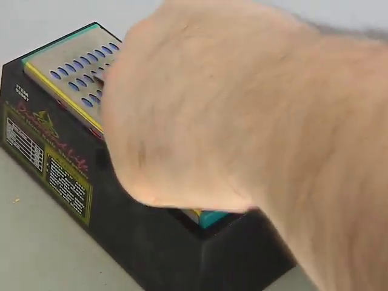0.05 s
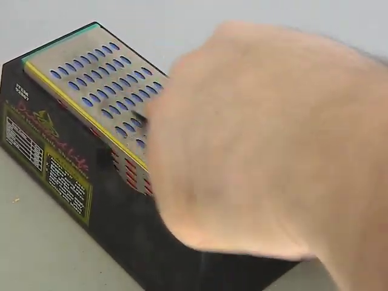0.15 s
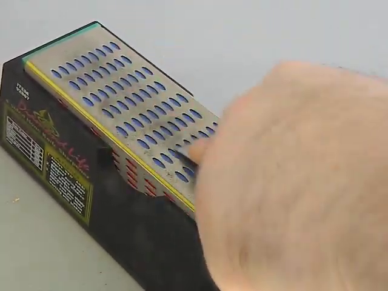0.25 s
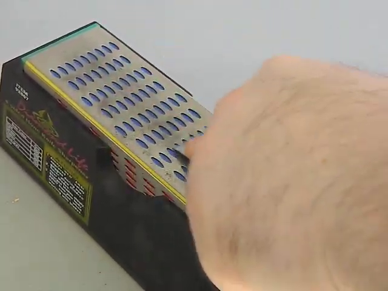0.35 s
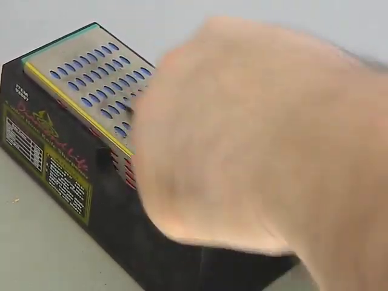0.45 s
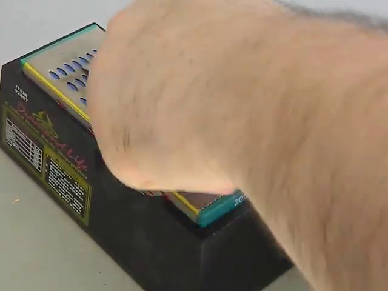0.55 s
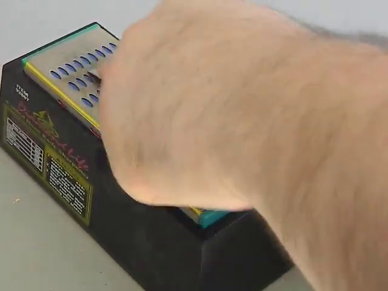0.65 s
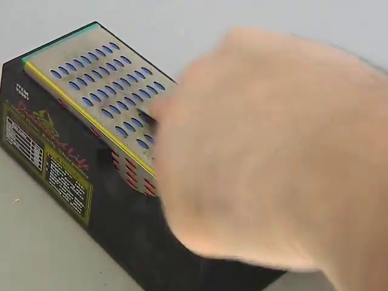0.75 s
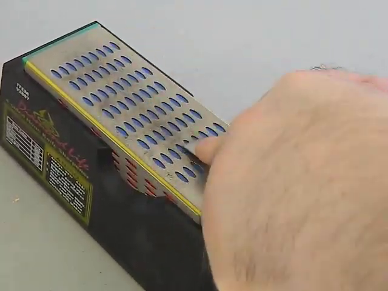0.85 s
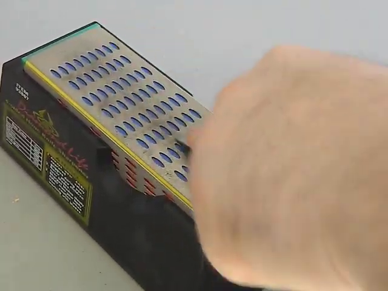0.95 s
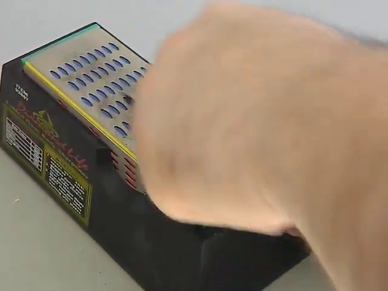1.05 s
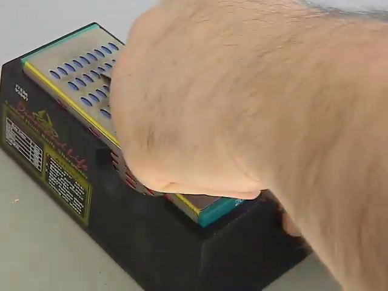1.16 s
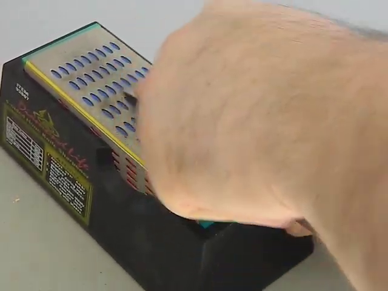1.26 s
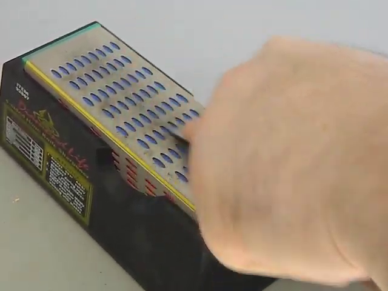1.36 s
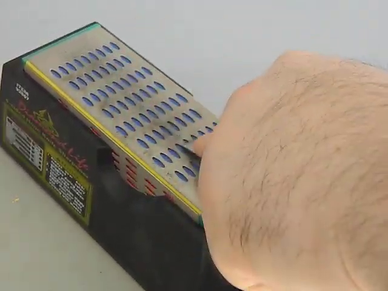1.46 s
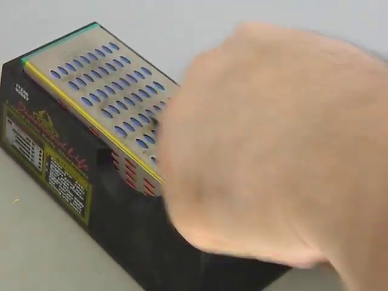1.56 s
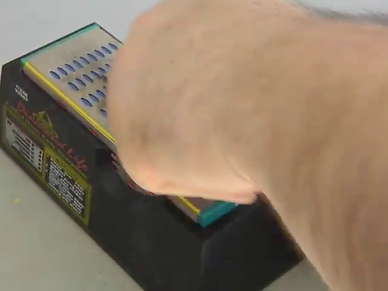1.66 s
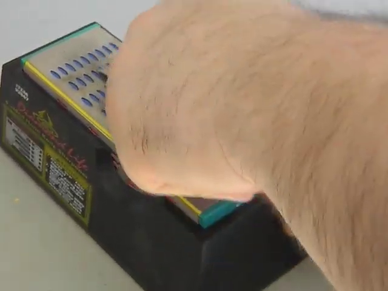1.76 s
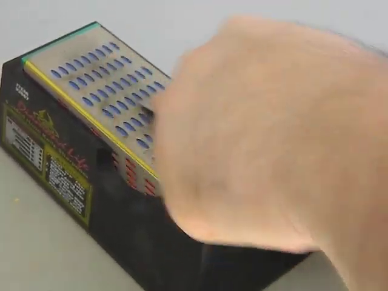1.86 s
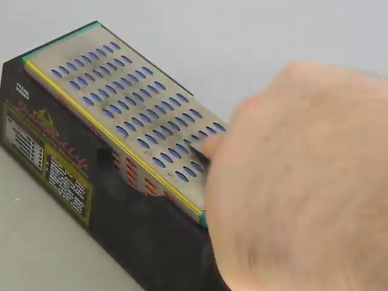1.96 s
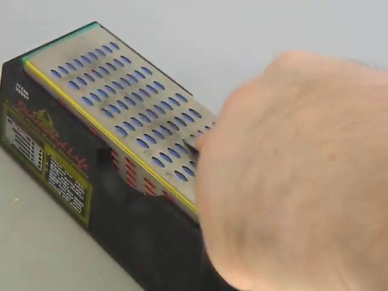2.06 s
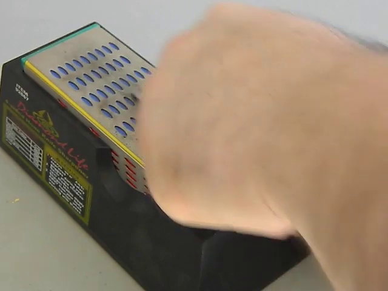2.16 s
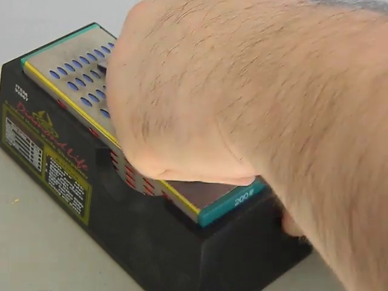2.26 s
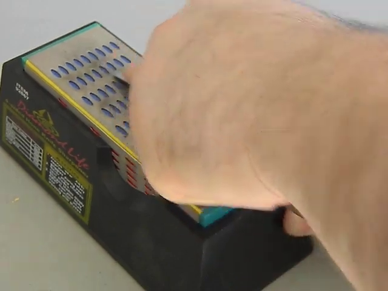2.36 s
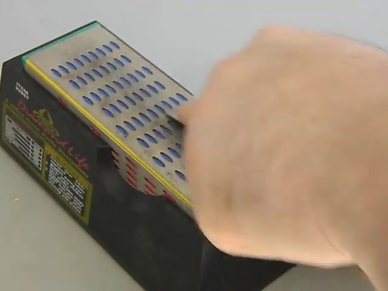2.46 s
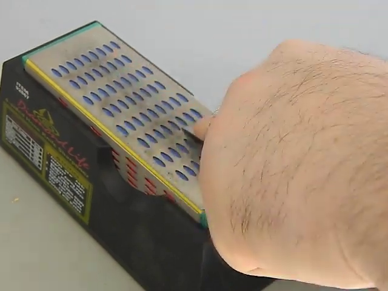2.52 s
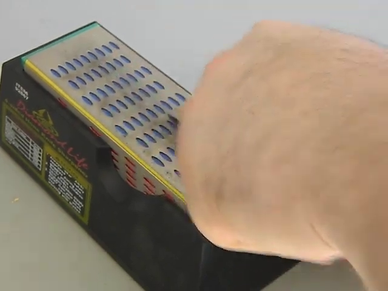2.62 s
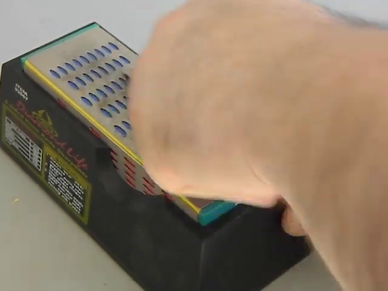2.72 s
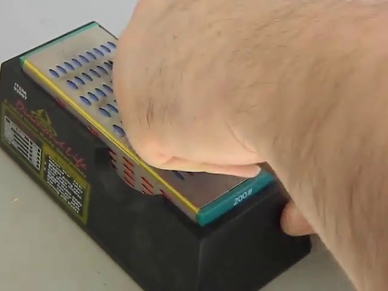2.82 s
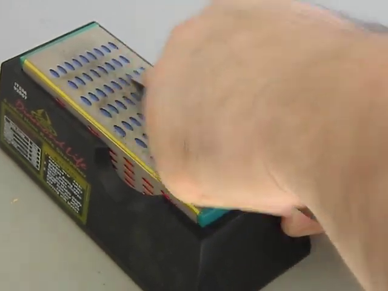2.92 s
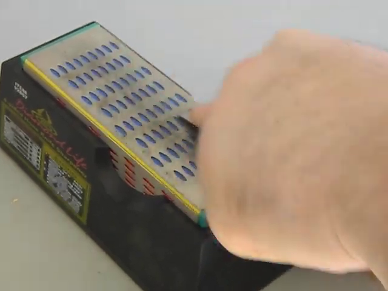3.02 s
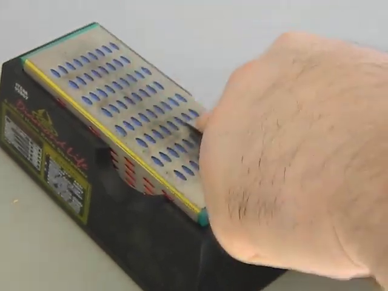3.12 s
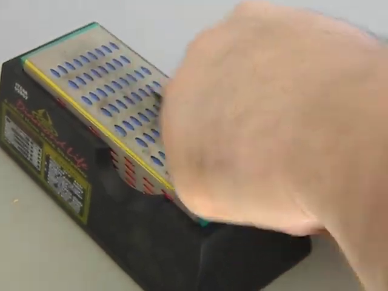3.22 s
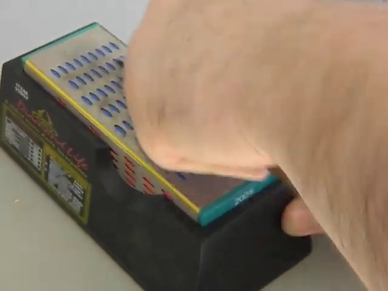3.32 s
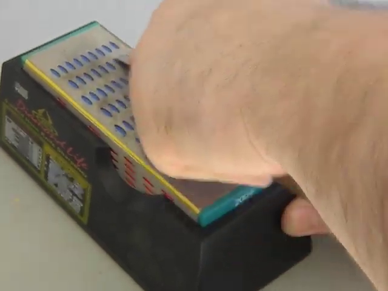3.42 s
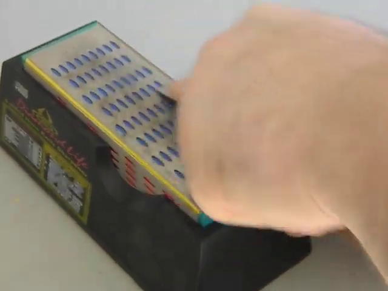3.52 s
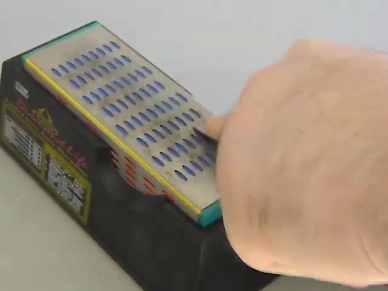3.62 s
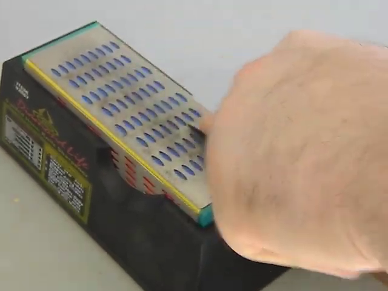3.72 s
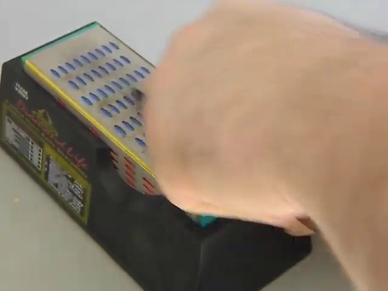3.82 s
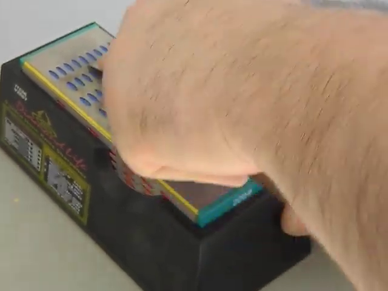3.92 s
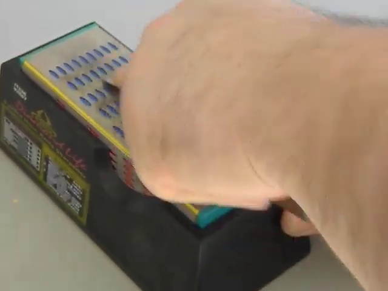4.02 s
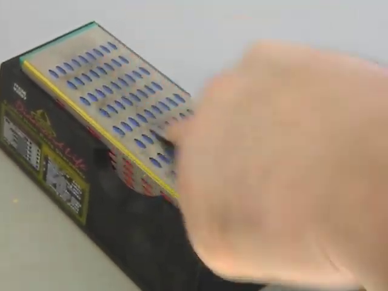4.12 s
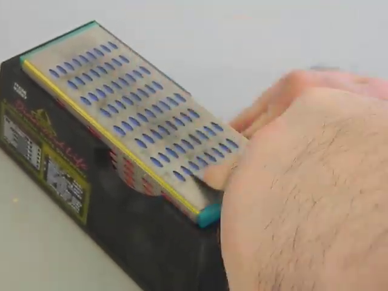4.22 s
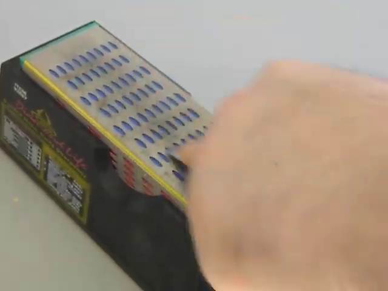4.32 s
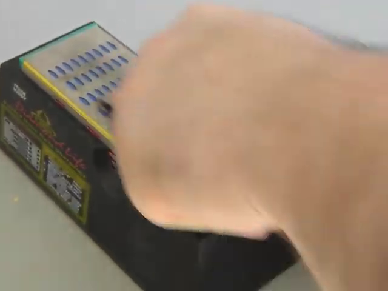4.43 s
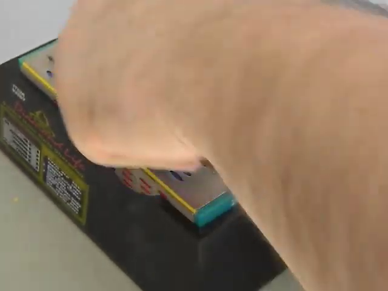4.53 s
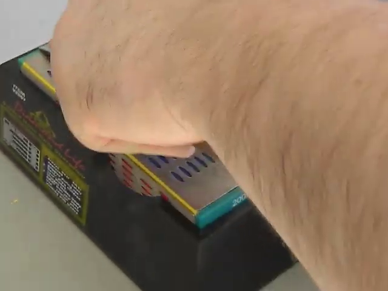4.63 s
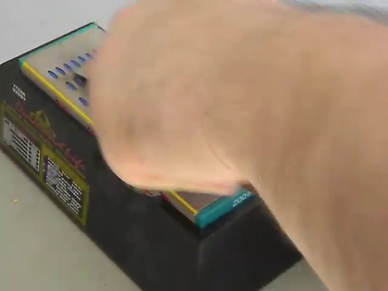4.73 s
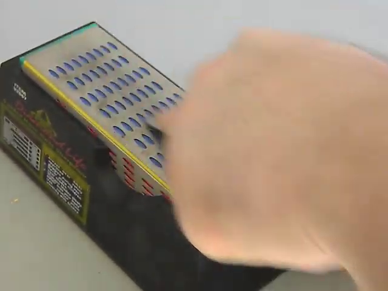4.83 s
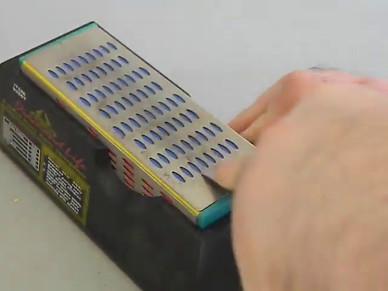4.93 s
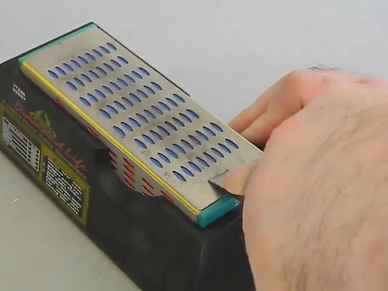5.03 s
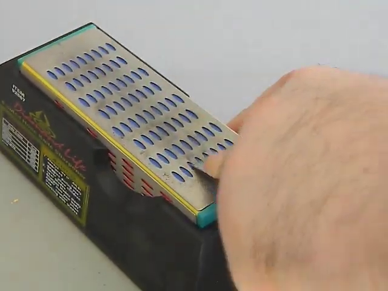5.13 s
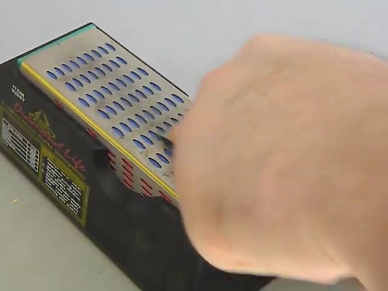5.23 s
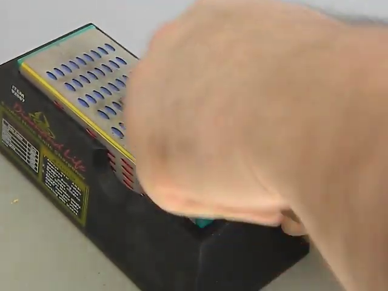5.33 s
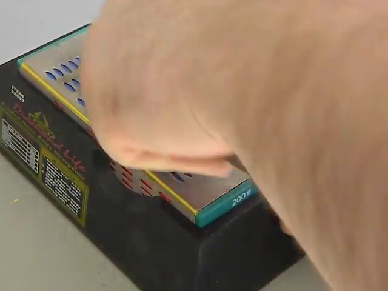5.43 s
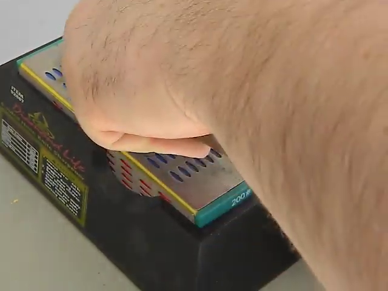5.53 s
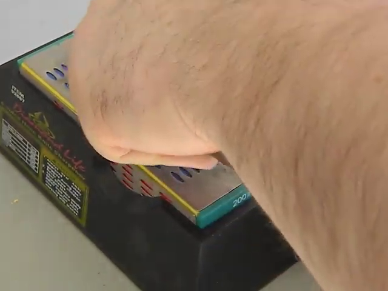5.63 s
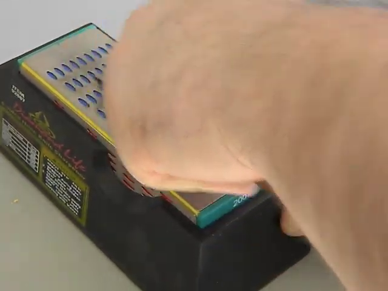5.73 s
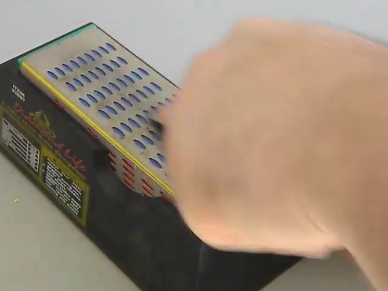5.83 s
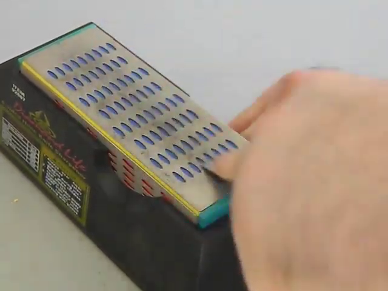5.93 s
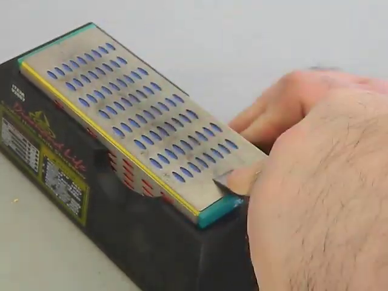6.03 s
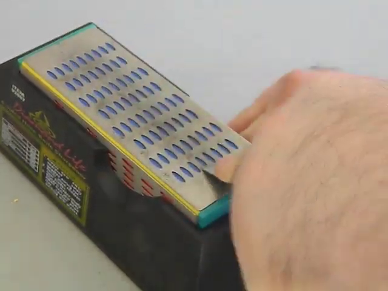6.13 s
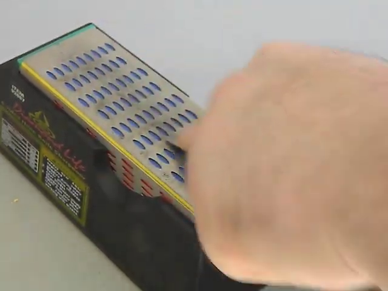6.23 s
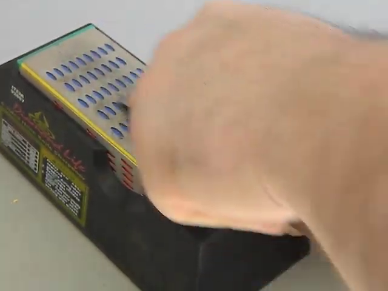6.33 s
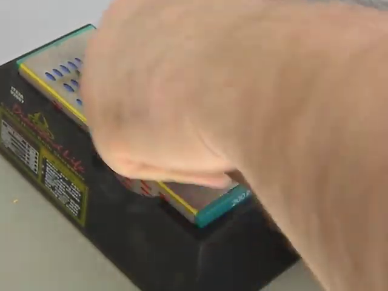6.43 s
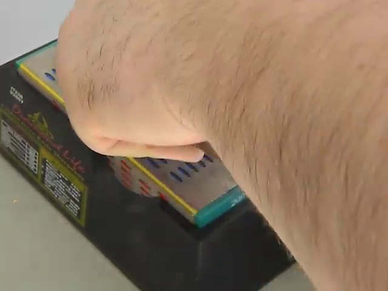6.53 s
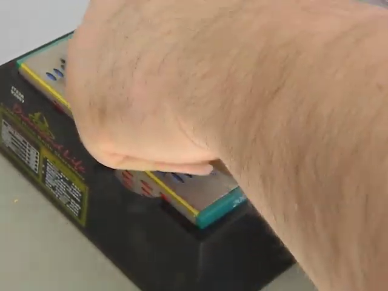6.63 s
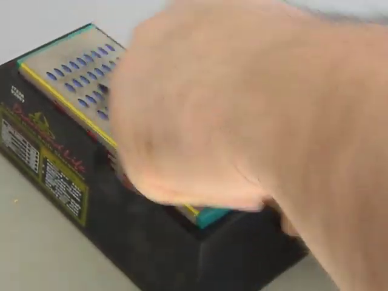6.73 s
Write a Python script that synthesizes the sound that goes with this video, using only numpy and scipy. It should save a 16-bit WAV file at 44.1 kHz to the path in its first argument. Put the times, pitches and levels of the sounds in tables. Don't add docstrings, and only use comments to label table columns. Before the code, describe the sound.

A steel chisel scrapes to and fro on a coarse slotted sharpening plate, over three strokes a second, dipping briefly at each turn. The rasp is gritty and metallic with a thin hiss on top, while the hollow block and bench boom softly below. Strokes grow harder around the middle, then longer and quieter. Close stereo pickup in a small, dry workshop with faint room tone.

```python
import sys
import numpy as np
from scipy import signal
from scipy.fft import rfft, irfft, next_fast_len
from scipy.io import wavfile
from scipy.ndimage import uniform_filter1d

SR = 44100
rng = np.random.default_rng(int(sys.argv[2]) if len(sys.argv) > 2 else 0)


def materialize(psi):
    bounded = np.clip(np.atleast_2d(psi).T, -1, 1)
    quanta = np.round(bounded * 32767).astype(np.int16)
    wavfile.write(sys.argv[1], SR, quanta)


def boost(x):
    u = np.asarray(x, float) / 20
    return 10 ** u


N = 298645
STEP = 32


def level(x, db):
    return x * boost(db) / np.sqrt(np.mean(x ** 2))


def gains(points, size):
    hz, db = np.transpose(points)
    bins_hz = np.fft.rfftfreq(size, 1 / SR)
    return boost(np.interp(np.log(bins_hz + 1), np.log(hz), db))


def colour(x, points):
    return irfft(rfft(x) * gains(points, x.shape[-1]), x.shape[-1])


def walk(rate):
    hold = int(SR / rate)
    steps = np.repeat(rng.standard_normal(N // hold + 1), hold)
    return 1.41 * uniform_filter1d(steps, hold)[:N]


def ring(force, modes, shift_db):
    total = 0
    for hz, width, db in modes:
        reached = force * boost(shift_db * walk(10))
        total = total + boost(db) * signal.lfilter(*signal.iirpeak(hz, hz / width, SR), reached)
    return total


def steady(x, span_s):
    span = int(span_s * SR)
    power = uniform_filter1d(uniform_filter1d(x ** 2, span), span)
    return x / np.sqrt(power + 1e-18)


def swells(times, levels_db, half_s):
    t = np.arange(0, N + STEP, STEP) / SR
    return np.exp(-((t[:, None] - times) / half_s) ** 2) @ boost(levels_db) ** 2


# t/s, rasp level/dB, tip hiss level/dB, bench level/dB, block level/dB
STROKES = [(-0.23, -26, -39, -19, -20.5), (0.051, -26, -37, -29, -25.5), (0.352, -23, -35, -21.5, -23.5),
           (0.652, -24, -35, -28, -23), (0.942, -25, -36, -23, -22), (1.208, -27, -37.5, -27.5, -29),
           (1.493, -24, -35.5, -23, -22), (1.764, -28, -36, -30, -25), (2.049, -26.5, -36.5, -24.5, -22),
           (2.318, -28, -34.5, -29.5, -27.5), (2.589, -25, -35.5, -25.5, -24.5),
           (2.865, -26.5, -33, -29, -26.5), (3.143, -22.5, -35.5, -24.5, -23.5),
           (3.425, -25, -31, -29.5, -25.5), (3.713, -21.5, -30, -23.5, -21.5),
           (3.978, -24.5, -32.5, -31, -27.5), (4.288, -21, -32.5, -24.5, -23.5),
           (4.648, -26.5, -34, -31.5, -27), (5.063, -29, -40, -27.5, -27.5),
           (5.616, -29.5, -37, -29, -27.5), (6.081, -26.5, -39, -24.5, -24.5),
           (6.615, -28.5, -40, -26, -31)]
TURN_S, RASP_DB, TIP_DB, BENCH_DB, BLOCK_DB = np.transpose(STROKES)
LAST_TURN_S = 7.0
# shift of the fastest moment [share of stroke],
# creep left at its starting turn level/dB, rest at its end [share of stroke]
HAND = [(0, 0, .03), (-.03, -0.5, 0.043), (.05, -1, .06), (-.13, -2.5, 0.044), (-0.019, -2.5, 0.044),
        (0.0071, .1, 0.031), (-0.014, -1, 0.057), (0.042, 0, 0.033), (-0.017, 0.5, 0.018),
        (0.0062, 0.5, 0.034), (0.017, -0.5, .03), (0.024, -1, .07), (0.02, -0.7, .04), (0.0046, 0.5, .04),
        (0.028, 0.5, 0.023), (-.03, 2, .02), (.02, 2.5, .04), (-0.029, -1, 0.056), (-0.03, -2, 0.072),
        (0.12, -2.5, 0.054), (.05, -7, .08), (-0.0021, -3, .03)]
CRUISE_S = 0.29


def stroke_db(levels_db, steep, creep_db, push_peak, pull_peak, linger_s, lead_s=0, extra=0):
    turns = np.append(TURN_S, LAST_TURN_S)
    shift, rest_db, pause = np.transpose(HAND)
    t = np.arange(0, N + STEP, STEP) / SR
    place = np.interp(t + lead_s, turns, np.arange(len(turns)))
    k = place.astype(int)
    peak = np.where(k % 2 == 0, push_peak, pull_peak) + shift[k]
    moved = np.clip((place - k) / (1 - pause[k].clip(0)), 0, 1)
    swing = np.sin(np.pi * moved ** (np.log(.5) / np.log(peak))).clip(0)
    hold = np.diff(turns)[k] / CRUISE_S
    speed = np.tanh(hold * swing) / np.tanh(hold)
    creep = boost(creep_db + np.interp(place, np.arange(len(rest_db)), rest_db))
    power = boost(levels_db[k]) ** 2 * (speed ** steep + creep ** 2) + extra
    keep = np.exp(-STEP / (linger_s * SR))
    power = signal.lfilter([1 - keep], [1, -keep], power, zi=[power[0] * keep])[0]
    return np.interp(np.arange(N) / SR, t, 10 * np.log10(power))


# t/s, rasp level/dB, bench level/dB, block level/dB
CATCHES = [(0.531, -22.5, -29, -24), (0.674, -26.5, -44, -28), (1.1, -31.5, -31, -21),
           (1.66, -27, -32, -26), (2.25, -30, -20, -20), (2.73, -26, -40, -35), (2.79, -33, -29.5, -25),
           (3.241, -31.5, -24, -23), (3.52, -29.5, -44.5, -33), (3.849, -28, -35, -22),
           (4.32, -34.5, -22, -39), (4.4, -23, -28, -21.5), (4.472, -23, -30, -39), (4.741, -24, -40, -36),
           (5.01, -38, -42, -32), (5.2, -32, -30, -22.5), (5.349, -38, -33, -20), (5.5, -36.5, -24, -25.5),
           (5.56, -40.5, -28.5, -39), (6.2, -39, -30, -36), (6.452, -22, -19, -23),
           (6.519, -34, -18.5, -43)]
CATCH_S, CATCH_RASP_DB, CATCH_BENCH_DB, CATCH_BLOCK_DB = np.transpose(CATCHES)


def catches(levels_db, stretch=1.0):
    return swells(CATCH_S, levels_db, half_s=0.024 * stretch)


def grit(speed, per_second, spread_db, patchy_db, patch_rate):
    chance = rng.random((3, N))
    bites = chance[0] < per_second * speed / SR
    size = boost(-spread_db * np.log(chance[1] + 1e-9)) * np.sign(chance[2] - .5)
    return bites * size / np.sqrt(speed) * boost(patchy_db * walk(patch_rate))


# f/Hz, level/dB per Hz
RASP = [(400, -7), (520, 3.5), (750, -1.5), (1060, 2), (1450, -3), (2000, -3.5), (2800, -35)]
# f/Hz, width/Hz, level/dB
PLATE = [(573, 11, 5), (612, 23, 3), (685, 18, 5.5), (813, 18, 5), (840, 18, 4.5), (1007, 11, 11),
         (1075, 21, 7.5), (1075.6, 7, 12.5), (1156, 25, 9.5), (1188, 22, 2.5), (1326, 19, 4),
         (1479, 12.5, 11), (1618, 15, 5.5), (1680, 5.4, 10.5)]


def plate_rasp(coarse, rasp_db):
    rasp = level(colour(coarse, RASP), 0) + level(ring(coarse, PLATE, shift_db=6.0), -1.6)
    return steady(rasp, 0.042) * boost(rasp_db - 2.0)


# f/Hz, level/dB per Hz
SCRATCH = [(1100, -35), (1800, -3.5), (2400, 0), (3000, 0.5), (3700, -3), (4200, -11.5), (5500, -13),
           (8000, -28)]


def edge_scratch(coarse, rasp_db, hiss_db):
    scratch = colour(coarse * boost(1.2 * walk(15)), SCRATCH)
    return steady(scratch, 0.094) * boost(0.7 * rasp_db + 0.34 * hiss_db - .6)


# f/Hz, level/dB per Hz
HISS = [(2700, -35), (4500, 2.5), (5900, -3.5), (6700, 0.5), (7800, -5), (9200, -10.5), (12000, -20)]
# f/Hz, width/Hz, level/dB
BLADE = [(5020, 130, 21), (6130, 160, 17), (7150, 220, 2), (8970, 65, 3), (11200, 400, -13),
         (12600, 310, -24)]


def tip_hiss(fine, hiss_db):
    hiss = level(colour(fine, HISS), 0) + level(ring(fine, BLADE, shift_db=0.0), -25.0)
    return steady(hiss, 0.044) * boost(hiss_db - 3.0)


# f/Hz, level/dB per Hz
SHEEN = [(7000, -22), (9200, -8.5), (10500, 0.5), (11900, 3), (13500, -3.5), (15600, -12.5)]


def tip_sheen(fine):
    push_pull_db = np.resize([-.4, .8], len(TIP_DB))
    sheen_db = stroke_db(TIP_DB + push_pull_db, steep=3.4, creep_db=-33, push_peak=0.46, pull_peak=0.46,
                         linger_s=.002, lead_s=.008)
    return steady(colour(fine, SHEEN), 0.053) * boost(sheen_db - 9.0)


# f/Hz, level/dB
RADIATE = [(92, -8.5), (112, 0.2), (235, 0), (260, -3), (320, -1.5), (345, 1), (620, -4.5), (1000, -7.5)]


def radiate(x):
    return colour(x, RADIATE)


# f/Hz, width/Hz, level/dB
BENCH = [(125.1, 5.5, 6.5), (137.1, 9.8, -0.5), (155, 24, 0), (182.6, 6, 1.5), (217.5, 3.3, -3.5),
         (289, 6.7, -42)]


def bench_top(push):
    brakes = swells(TURN_S[1::2] - 0.066, BENCH_DB[::2] - 5, half_s=0.027)
    bench_db = stroke_db(BENCH_DB, steep=0.97, creep_db=-9, push_peak=0.52, pull_peak=0.29,
                         linger_s=0.011, extra=catches(CATCH_BENCH_DB) + brakes)
    return steady(radiate(ring(push, BENCH, shift_db=3.0)), 0.062) * boost(bench_db + 1.05)


# f/Hz, width/Hz, level/dB
BLOCK = [(368.4, 14.1, -0.5), (378.6, 16, -9), (419.4, 13.8, 1.5), (476, 6.1, -16), (545, 8.6, -28)]


def hollow_block(push, coarse):
    block_db = stroke_db(BLOCK_DB, steep=1.7, creep_db=-14, push_peak=0.47, pull_peak=0.49,
                         linger_s=0.0064, extra=catches(CATCH_BLOCK_DB, stretch=0.98))
    block = radiate(ring(push + 0.82 * coarse, BLOCK, shift_db=2.5))
    return steady(block, 0.13) * boost(block_db + 0.1)


# f/Hz, width/Hz, level/dB
LEGS = [(74.5, 10.3, 36), (40, 20, -22)]
# t/s, level/dB, half length/s
ROCKS = [(0.37, -26, 0.028), (0.6, -42, .03), (1.06, -24.5, 0.082), (1.32, -34, .03), (1.67, -26, .05),
         (1.798, -28.5, 0.079), (2.24, -34, .04), (2.722, -21.5, 0.067), (3.3, -24, 0.061),
         (3.848, -27, 0.026), (3.953, -27, 0.041), (4.417, -20, 0.029), (4.58, -28, .03), (5.174, -22, .04),
         (5.368, -30, 0.032), (5.484, -21, 0.033), (5.548, -28, .03), (5.865, -33, 0.027),
         (6.5, -30, 0.055)]


def bench_legs(push):
    sway_db = stroke_db(BENCH_DB - 12, steep=1.4, creep_db=0, push_peak=0.87, pull_peak=0.44,
                        linger_s=0.0055, extra=swells(*np.transpose(ROCKS)))
    rock = steady(ring(push, LEGS, shift_db=-2.5), 0.068) * boost(sway_db)
    return ring(rock, [(69.6, 46, 0.79)], shift_db=2.0)


def chisel():
    rasp_db = stroke_db(RASP_DB, steep=1.8, creep_db=-14.5, push_peak=.48, pull_peak=.42,
                        linger_s=0.0043, extra=catches(CATCH_RASP_DB))
    hiss_db = stroke_db(TIP_DB + 1.0, steep=3.83, creep_db=-18.5, push_peak=0.44, pull_peak=0.48,
                        linger_s=0.0016, lead_s=0.0088, extra=catches(CATCH_RASP_DB - 24.5, stretch=0.5))
    speed = np.clip(boost(.5 * (rasp_db - rasp_db.max())), .15, 1)
    judder = boost(0.3 * walk(27) + 1.02 * walk(120))
    coarse = grit(speed, per_second=14000, spread_db=1.47, patchy_db=0.75, patch_rate=230) * judder
    fine = grit(speed, per_second=23000, spread_db=2.5, patchy_db=1.35, patch_rate=60) * judder
    push = grit(speed, per_second=3000, spread_db=1.5, patchy_db=1.0, patch_rate=9.3) * judder
    steel = plate_rasp(coarse, rasp_db) + edge_scratch(coarse, rasp_db, hiss_db)
    steel = steel + tip_hiss(fine, hiss_db) + tip_sheen(fine)
    return steel + bench_top(push) + hollow_block(push, coarse) + bench_legs(push)


# f/Hz, level/dB
WET = [(40, -6), (150, -15), (400, -14), (1200, -13.5), (3000, -5.5), (6000, 0.5), (12000, 0.5)]
# f/Hz, level/dB
LEAN = [(60, 5.5), (200, 0.7), (380, -0.5), (1290, -2), (2380, -3), (4400, 3), (8120, 3), (15000, 0.5)]


def workshop(x, t60_s, gap_s, move_rate, count):
    size = next_fast_len(N + SR)
    t = np.arange(SR // 4) / SR
    tail = rng.standard_normal((count, 2, len(t))) * boost(-60 * t / t60_s) * (t > gap_s)
    tail = tail / np.sqrt(np.sum(tail ** 2, axis=2, keepdims=True))
    share = np.array([walk(move_rate) for _ in tail])
    share = share / np.sqrt(np.sum(share ** 2, axis=0))
    echoes = sum(rfft(x * part, size) * rfft(path, size) for part, path in zip(share, tail))
    lean = np.sqrt(gains(LEAN, size))
    heard = (rfft(x, size) + gains(WET, size) * echoes) * np.array([lean, 1 / lean])
    return irfft(heard, size)[:, :N]


# f/Hz, level/dB per Hz
SHOP = [(30, -8), (80, 21), (300, 3), (1500, 4), (6000, -47), (15000, -64)]


def air():
    noise = rng.standard_normal((3, N))
    return level(colour(noise[:2] * 0.49 + noise[2], SHOP), -39.5)


def scene():
    return workshop(chisel(), t60_s=0.055, gap_s=.0004, move_rate=16, count=5) + air()


def top_cut(x):
    return signal.sosfilt(signal.butter(12, 15760, fs=SR, output="sos"), x)


def record(dry):
    mic = signal.sosfilt(signal.butter(2, 45, "high", fs=SR, output="sos"), dry)
    mix = np.tanh(1.086 * mic) / 1.097
    return top_cut(mix)


dry = scene()
out = record(dry)
materialize(out)
```